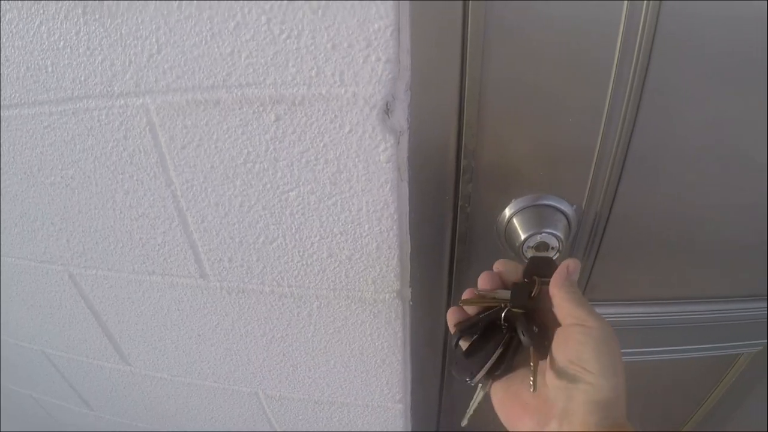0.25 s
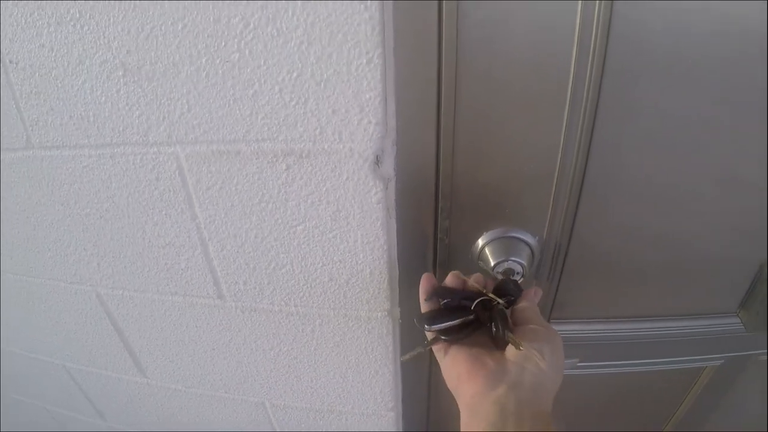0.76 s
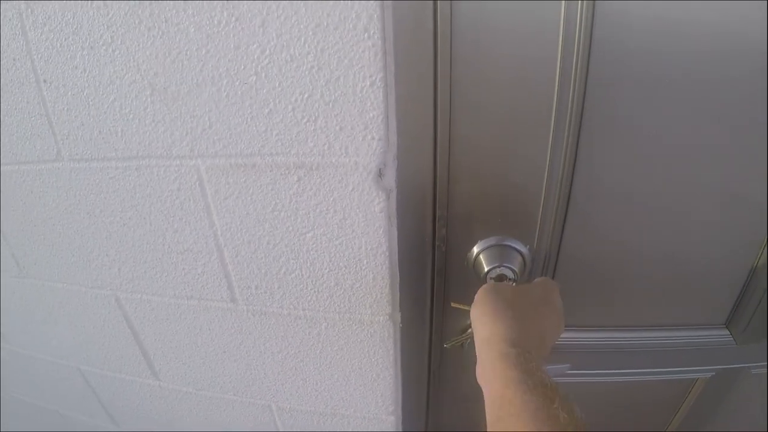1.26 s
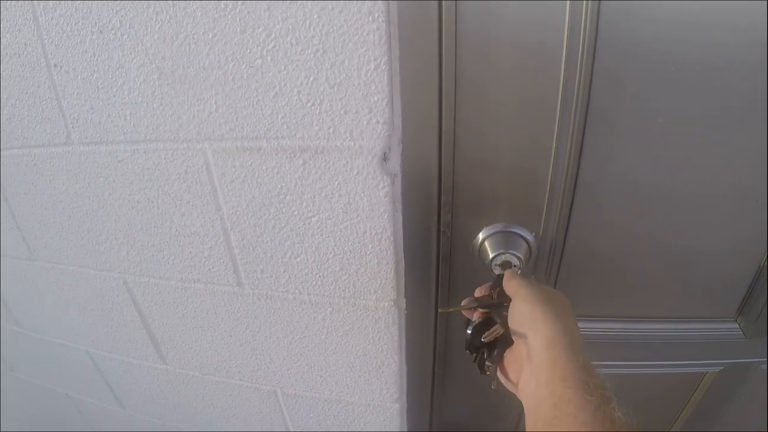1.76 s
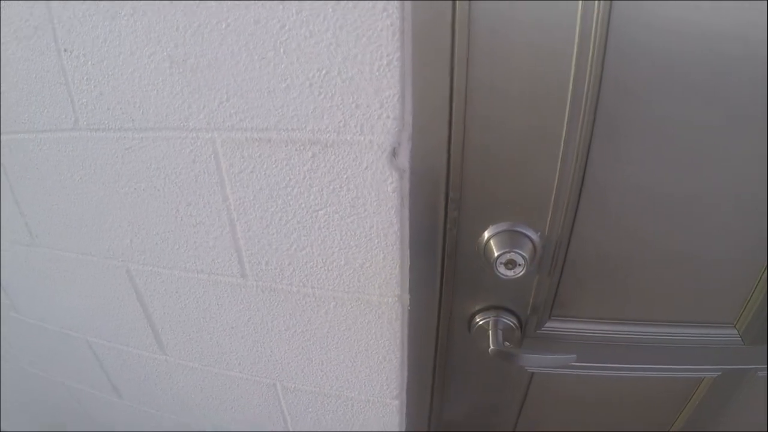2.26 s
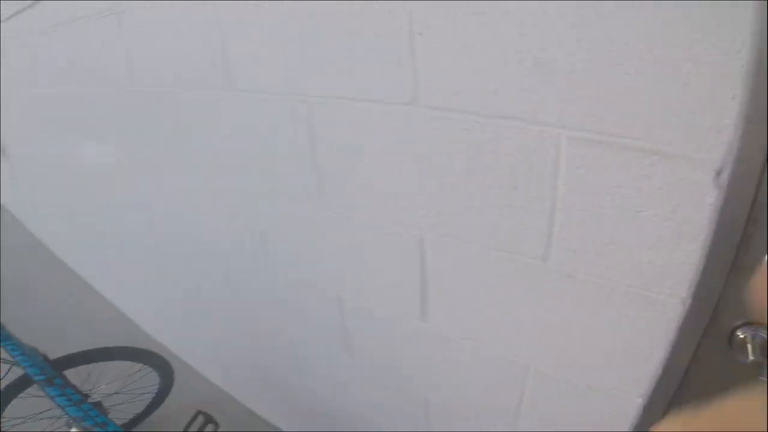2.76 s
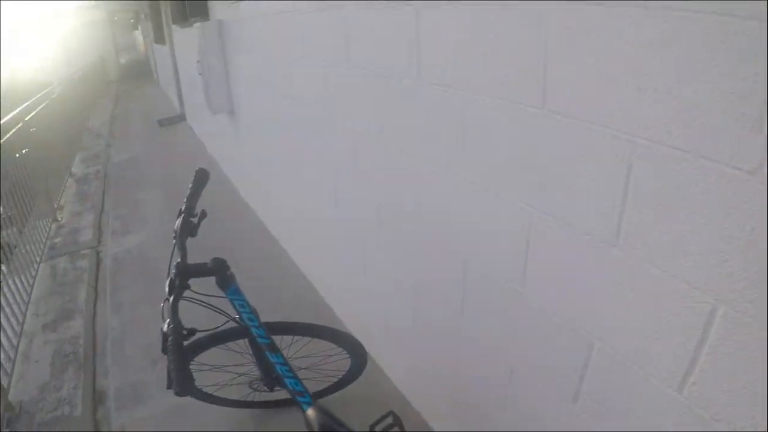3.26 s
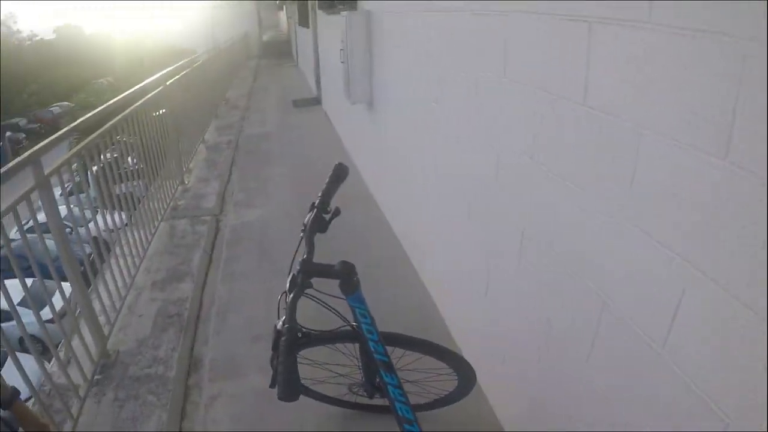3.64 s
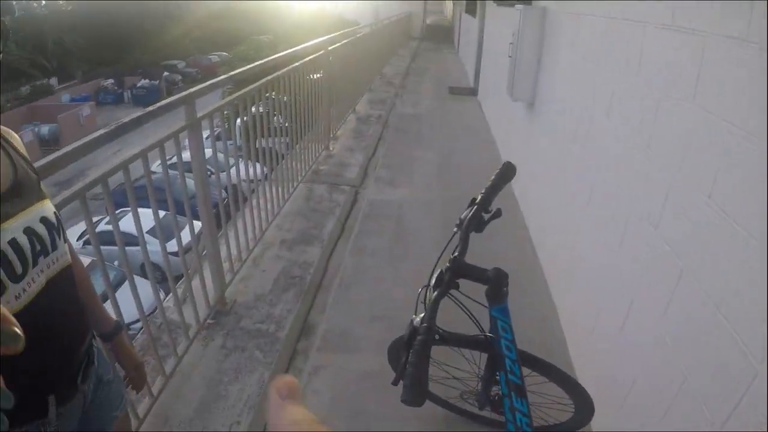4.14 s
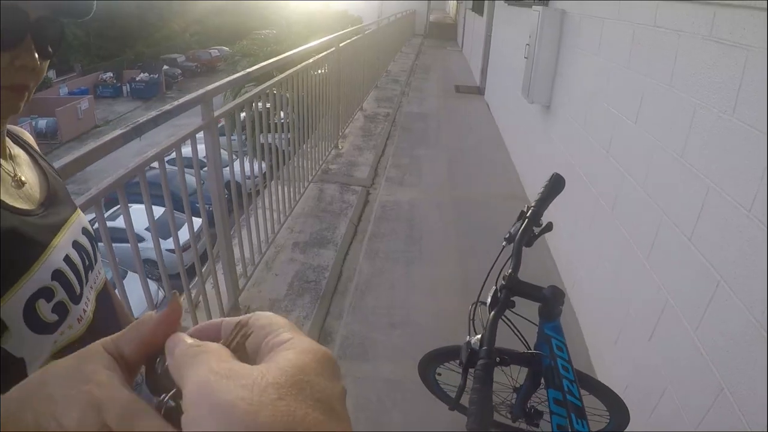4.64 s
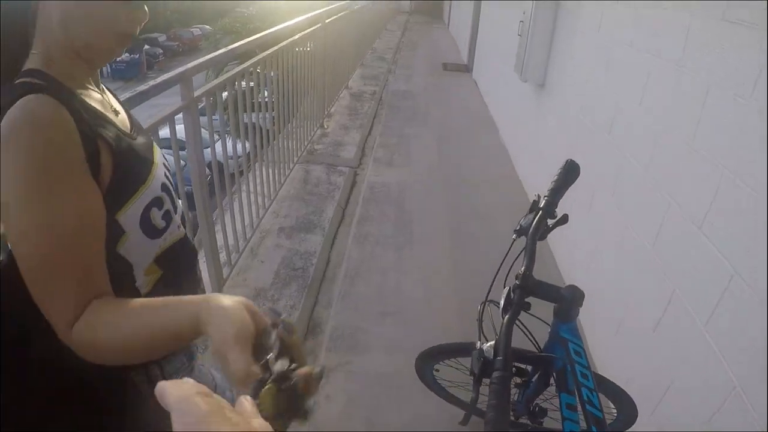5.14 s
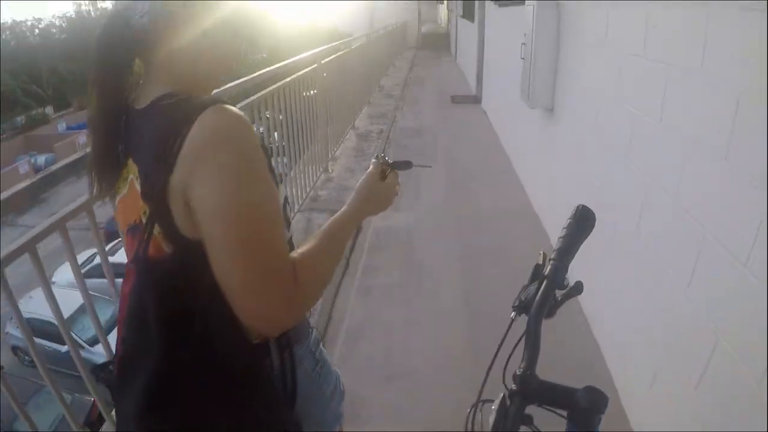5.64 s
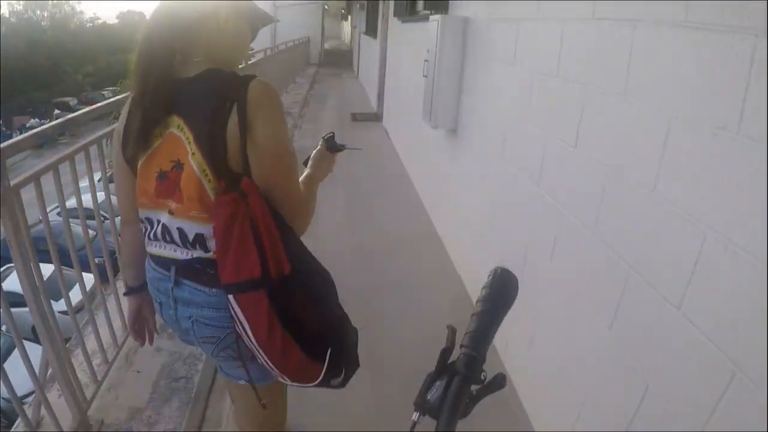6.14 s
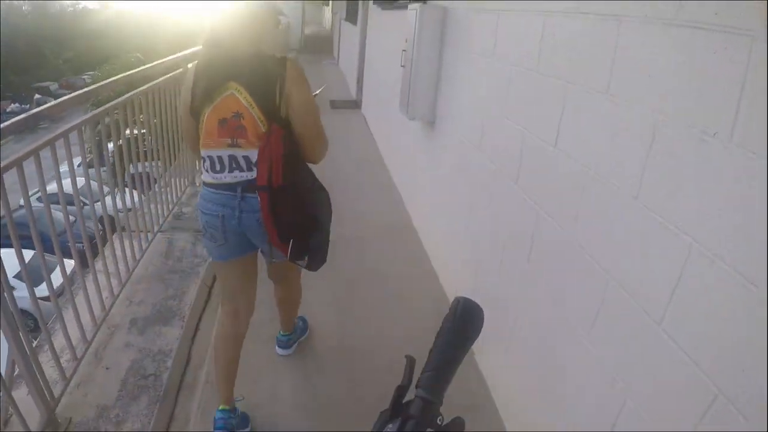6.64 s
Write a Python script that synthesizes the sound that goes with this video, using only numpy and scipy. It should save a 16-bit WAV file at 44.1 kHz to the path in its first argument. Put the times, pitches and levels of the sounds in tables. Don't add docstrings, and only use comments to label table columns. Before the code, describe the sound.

Close metallic key clatter and lock clunks, heavy handling thumps with a rubbery squeak, then soft key jingles over wind rumble and faint traffic.

```python
import sys
import numpy as np
from scipy import signal
from scipy.fft import rfft, irfft, next_fast_len
from scipy.io import wavfile
from scipy.ndimage import uniform_filter1d, map_coordinates

SR = 44100
rng = np.random.default_rng(int(sys.argv[2]) if len(sys.argv) > 2 else 0)


def to_wav(s):
    ch = np.atleast_2d(s).T
    pcm = np.round(np.clip(ch, -1, 1) * 32767)
    wavfile.write(sys.argv[1], SR, pcm.astype(np.int16))


def makeup_ratio(level_db):
    decades = np.asarray(level_db, float) / 20
    return 10 ** decades


N = 304290

# t/s, peak/dB, f/Hz, t60/s
THUMPS = [(0.237, -17.5, 42, 0.084), (3.124, -8.5, 35, .06), (3.163, -8.5, 14, 0.2),
          (3.222, -11, 40, 0.081), (0.63, -10, 58, 0.034), (0.956, -19, 45, 0.085), (1.316, -13, 48, 0.057),
          (1.338, -14, 43.6, 0.044), (2.089, -8, 29, 0.066), (2.121, -9, 30, 0.075), (2.526, 3, 32, 0.025),
          (2.543, -8, 104, 0.021), (2.932, -1, 44, 0.069), (2.955, -13, 42, .06), (3.053, -5.5, 38, 0.087),
          (3.3, -8.5, 32, 0.21), (3.385, -5, 31, 0.05), (3.419, -5, 78, 0.036), (3.622, -11.5, 33, 0.16),
          (3.669, 4.5, 32.5, 0.018), (5.6795, -12, 200, 0.023), (5.6901, -4.5, 184, 0.02),
          (5.7092, -17, 144, 0.038), (5.779, -11, 195, 0.065), (5.799, -12, 81, 0.14),
          (5.841, -11, 32, 0.09), (5.898, -8.5, 133, 0.079), (5.916, -7, 60, 0.041),
          (6.043, -14.5, 29, 0.15)]
# f/Hz, level/dB
CRACK = [(1180, -18), (2910, -10), (3740, -5), (4690, -14.5), (5750, -3.5), (7500, -4.5), (14200, -36.5),
         (16000, -59.5)]
JINGLE = [(2500, -23.5), (4050, 1.5), (4600, -7), (7100, -3), (8400, -3.5), (10000, -14), (14700, -30.5),
          (16500, -51.5)]
CUPPED = [(1200, -10), (2150, 10), (3000, -7), (4100, 5), (5600, -19), (8000, -10), (10500, -26),
          (15000, -43)]
# f/Hz, level/dB
SCRAPE = [(600, -120), (1100, -6), (1850, -4.5), (2400, -9), (3200, -9), (5500, -21.5), (8000, -120)]
BRIGHT = [(3000, -120), (4500, -8.5), (7000, 0.5), (10000, -11.5), (12500, -25), (15000, -34.5),
          (17000, -120)]
HOLLOW = [(80, -120), (160, 9), (400, -3), (650, -7), (1200, -18), (1800, -120)]


def unit(x):
    return x / np.sqrt(np.mean(x ** 2) + 1e-20)


def along(points, hz, column=1):
    rows = np.transpose(points)
    return np.interp(np.log(hz + 1), np.log(rows[0] + 1), rows[column])


def curves(rows):
    s, *cols = np.transpose(rows)
    return [np.interp(np.arange(N) / SR, s, c) for c in cols]


def wobble(rate_hz):
    knots = rng.standard_normal(int(N * rate_hz / SR) + 4)
    return map_coordinates(knots, [np.arange(N) * rate_hz / SR])


def filtered(x, response):
    m = next_fast_len(N + SR // 2)
    return irfft(rfft(x, m) * response(np.fft.rfftfreq(m, 1 / SR)), m)[..., :N]


def noise(spectrum):
    return unit(filtered(rng.standard_normal((2, N)), lambda hz: makeup_ratio(along(spectrum, hz))))


def impulses(s, db):
    return np.bincount(np.round(s * SR).astype(int), makeup_ratio(db), N)


def stroke(s, length_s):
    t = np.arange(N) / SR
    return np.clip(np.minimum((t - s) / 0.015, (s + length_s - t) / 0.018), 0, 1)


def strokes(rows):
    return sum(makeup_ratio(db) * stroke(s, length_s) for s, length_s, db in rows)


def decay(rows, t60s, rise_s):
    env, t = np.zeros(N + SR), np.arange(SR // 5) / SR
    for (s, db), t60 in zip(rows, t60s):
        fall = makeup_ratio(db - 60 * t / max(t60, .002))
        env[round(s * SR):][:len(t)] += fall * (1 - np.exp(-t / rise_s))
    return env[:N]


def swings(rows):
    out, t = np.zeros(N + SR), np.arange(SR // 4) / SR
    for s, db, hz, t60 in rows:
        fall = makeup_ratio(db + 9.0 - 60 * t / max(t60, .005))
        rise = 1 - np.exp(-t * hz / 0.035)
        out[round(s * SR):][:len(t)] += fall * np.sin(2 * np.pi * hz * t) * rise
    return out[:N]


def air():
    # t/s, level/dB
    stir = [(0.0, 3), (0.67, -0.5), (1.15, 4.5), (1.42, -0.5), (2.11, 2), (2.77, -0.5), (2.94, 2.5),
            (3.28, 12), (3.45, 4), (3.62, -6), (3.88, 0.5), (4.05, 0.5), (5.6, -0.5), (5.82, 5.5),
            (5.98, -1), (6.32, 3.5), (6.9, 4.5)]
    # t/s, level/dB
    wind = [(0, -19.5), (.15, -26.5), (.8, -24), (1.9, -22), (2.2, -18), (2.35, -19), (2.6, -24.5),
            (2.85, -30), (3.0, -23), (3.5, -16), (3.8, -33), (4.05, -25.5), (4.4, -25), (5.0, -32),
            (5.55, -31), (6.3, -28.5), (6.9, -22)]
    # t/s, hold/s, gain/dB
    ducks = [
        (2.53, 0.057, -16),
        (3.57, 0.063, -5),
        (3.661, 0.237, -7),
        (5.917, 0.12, -9.5),
    ]
    # f/Hz, level/dB
    rumble_spectrum = [(8, -16.5), (18, 5.5), (45, -2), (80, -12), (130, -29), (300, -120)]
    flutter_spectrum = [(50, -120), (85, -3), (140, 1.5), (250, -10.5), (450, -19.5), (900, -120)]
    murmur_spectrum = [(88, 2), (183, -4.5), (648, -13), (866, -12.5), (1650, -17), (2240, -22.5),
                       (3500, -43.5), (7700, -120)]
    hiss_spectrum = [(1470, -18), (2500, 3), (3830, 3), (5070, -1.5), (9810, -4), (13400, -17.5),
                     (15000, -20), (16000, -48.5)]

    stir_db, = curves(stir)
    duck_db = sum(db * stroke(s, hold_s) for s, hold_s, db in ducks)
    s, db, _, t60 = np.transpose(THUMPS)
    shake = decay(zip(s, db - 9.5), 3.6 * t60, rise_s=.012)
    deep = makeup_ratio(curves(wind)[0]) + shake
    rumble = deep * makeup_ratio(0.5 * duck_db) * unit(makeup_ratio(3.0 * wobble(12)) * noise(rumble_spectrum))
    flutter = unit(makeup_ratio(4.2 * wobble(16)) * noise(flutter_spectrum))
    flutter *= makeup_ratio(-40.5 + 1.5 * stir_db + duck_db)
    murmur = makeup_ratio(-40 + stir_db + duck_db + 1.3 * wobble(32)) * noise(murmur_spectrum)
    grit = makeup_ratio(1.1 * wobble(40) + 1.5 * wobble(300))
    hiss = makeup_ratio(-54 + 0.75 * stir_db + duck_db) * unit(grit * noise(hiss_spectrum))
    return rumble + flutter + murmur + hiss


def shimmer(shifts, spectrum, tick_db):
    ticks_per_s, tick_s = 120, 0.0015
    sizes = (rng.random(N) < ticks_per_s / SR) * makeup_ratio(3.3 * rng.standard_normal(N))
    ticks = unit(signal.lfilter([1], [1, -np.exp(-1 / (tick_s * SR))], sizes))
    grain = makeup_ratio(2.9 * wobble(70) + 1.7 * wobble(350))
    return strokes(shifts) * unit((grain + makeup_ratio(tick_db) * ticks) * noise(spectrum))


def bunch_shifts():
    # start/s, length/s, level/dB
    shifts = [
        (0, 0.072, -40),
        (.26, 0.087, -42),
        (1.0, 0.038, -49),
        (1.11, 0.11, -45),
        (1.26, 0.17, -42.5),
        (1.43, 0.2, -43),
        (1.84, 0.165, -43),
        (2.135, 0.088, -35),
        (2.63, 0.051, -42.5),
    ]
    # start/s, length/s, level/dB
    handed = [
        (4.37, .087, -54),
        (5.2, 0.064, -37),
        (5.27, .13, -38.5),
        (5.39, 0.054, -46.5),
        (6.112, 0.098, -45),
        (6.24, .12, -53.5),
    ]
    # start/s, length/s, level/dB
    rattle = [
        (3.87, 0.12, -44),
    ]
    out = shimmer(shifts, CRACK, tick_db=-13.5) + shimmer(handed, JINGLE, tick_db=-12)
    return out + shimmer(rattle, CUPPED, tick_db=8)


def keys(contacts, spectrum, t60, knock_db):
    # f/Hz, level/dB
    modes_table = [(3650, -16.5), (4020, -22), (5350, -27), (5890, -6.5), (6200, -3), (7080, -6),
                   (8400, -27.5), (9400, -7), (10300, -15.5), (12100, -27)]
    hz, level = np.transpose(modes_table)
    s, db, loudest_hz = np.transpose(contacts)
    luck = rng.standard_normal((len(s), 2, len(hz)))
    rattle = rng.random((len(s), 2, 9))
    ring, t = np.zeros(N + SR), np.arange(SR // 10) / SR
    rise = 1 - np.exp(-t / 0.000085)
    for k in range(len(s)):
        tones = np.append(hz * (1 + 0.011 * luck[k, 0]), loudest_hz[k])[:, None]
        sizes_db = np.append(level + 3.9 * luck[k, 1] - 15.0, -7)[:, None]
        modes = (makeup_ratio(sizes_db - 105 * t / t60) * np.sin(2 * np.pi * tones * t) * rise).sum(0)
        delays_s = np.append(0, 0.77 * t60 * rattle[k, 0])
        blows = makeup_ratio(-45 * delays_s / t60 - 4.5 * np.append(0, rattle[k, 1] + 0.36))
        hit = signal.fftconvolve(np.bincount((delays_s * SR).astype(int), blows), modes)
        ring[round(s[k] * SR):][:len(hit)] += makeup_ratio(db[k] + 0.084 * (db[k] + 23.0)) * hit

    lead_in = decay(zip((N - 1) / SR - s, db - 27.0), 0 * s + 0.024, rise_s=0.00024)[::-1]
    slide = lead_in + decay(zip(s, db - 17.5), 0 * s + 1.88 * t60, rise_s=0.0016)
    strike = decay(zip(s, db + 0.5), 0 * s + 0.0055, rise_s=0.00051)
    body = clunks(s, db + knock_db)
    snap = filtered(impulses(s, db + 4.5), lambda f: makeup_ratio(along(spectrum, f)))
    grit = wobble(500)
    tonal = (makeup_ratio(3.2 * grit - 0.5) * ring[:N] + snap) * [[1], [.3]]
    return tonal + (strike + makeup_ratio(4.17 * grit) * slide) * noise(spectrum) + body


def lock_contacts():
    # t/s, peak/dB, loudest key f/Hz
    going_in = [(0.0034, -22, 6700), (0.029, -16, 7150), (0.0452, -13.5, 6900), (0.0625, -6, 7330),
                (0.1575, -22, 3960), (0.167, -15, 7260), (0.268, -11, 7160), (0.288, -30, 6250),
                (0.3084, -18, 6060), (0.3301, -20, 7100), (0.389, -19.5, 6180), (0.483, -32.5, 6800),
                (0.5543, -28.5, 6160), (0.668, -30.5, 6100)]
    turning = [(0.945, -19, 6800), (0.9851, -9.5, 6340), (1.0123, -8, 7170), (1.0376, -15.5, 3600),
               (1.1174, -19, 5850), (1.149, -18.5, 5840), (1.1902, -8.5, 6500), (1.2452, -4.5, 5600),
               (1.257, -6.5, 7300), (1.2732, -2, 6900), (1.409, -24.5, 6950), (1.449, -21, 6000),
               (1.4684, -16.5, 5500), (1.4943, -13, 5750), (1.552, -21, 5800), (1.5783, -19, 6240),
               (1.661, -28.5, 6300)]
    coming_out = [(1.6991, -14, 6320), (1.7754, -21, 6000), (1.8003, -26, 6000), (1.8493, -24.5, 6000),
                  (1.8587, -14.5, 6200), (1.8976, -16, 5900), (1.9192, -20, 3640), (1.929, -14.5, 5700),
                  (1.964, -16.5, 5830), (1.9766, -12, 5980), (2.017, -29.5, 5900), (2.097, -22.5, 3870),
                  (2.105, -18.5, 4200), (2.1471, -12.5, 6930), (2.165, -13.5, 6230), (2.174, -17.5, 6430),
                  (2.201, -21, 7200), (2.303, -18.5, 7050), (2.352, -25.5, 6100), (2.3936, -18, 6800),
                  (2.632, -20, 6070)]
    grazes = [(.0114, -24.5, 6600), (.0207, -25, 7100), (.244, -30.5, 3650), (.2568, -24, 7300),
              (.2764, -23, 7340), (.3964, -24.5, 7000), (.49, -31, 6100), (.5117, -38, 6100),
              (.611, -34, 6200), (.7174, -32.5, 7070), (.9362, -27, 7600), (.9514, -39, 7420),
              (.9779, -35.5, 8000), (1.0055, -30, 8500), (1.9047, -23, 6470), (1.944, -16, 6040),
              (2.0507, -31, 6000), (2.14, -21.5, 5900), (2.1573, -16.5, 8500), (2.2966, -24.5, 4000)]
    out = keys(grazes, CRACK, t60=0.021, knock_db=-13)
    out += keys(going_in + coming_out, CRACK, t60=.025, knock_db=-18.0)
    return out + keys(turning, CRACK, t60=.021, knock_db=-16.0)


def rings():
    # t/s, peak/dB, f/Hz, t60/s
    free = [(.029, -27, 13500, .015), (.029, -27.5, 9500, 0.019), (.0452, -24.5, 9700, 0.021),
            (.058, -26, 12050, 0.019), (.0625, -18.5, 7250, 0.036), (.167, -23.5, 7150, 0.028),
            (.395, -36, 7150, 0.05), (.33, -37.5, 7150, 0.042), (.268, -19, 4850, 0.015),
            (.985, -20, 3800, 0.017), (.985, -27, 2300, 0.017), (1.012, -16, 5670, 0.033),
            (1.866, -19.5, 5930, 0.034), (2.157, -24.5, 10200, 0.05), (1.939, -25, 5900, 0.044),
            (1.977, -19.5, 5950, 0.033), (2.105, -29.5, 4020, 0.037), (2.15, -28, 2430, 0.053),
            (2.15, -23.5, 7100, .06), (2.303, -22.5, 7080, 0.034), (2.165, -13, 5930, 0.073),
            (2.2, -29, 7200, 0.072), (2.298, -32, 4050, 0.047), (4.401, -28, 5780, 0.031),
            (5.206, -48, 12100, 0.054), (5.229, -21, 8350, 0.12), (5.228, -18, 7800, 0.047),
            (5.232, -22, 9100, .05), (5.232, -34, 4050, 0.073), (5.289, -28, 7100, .05),
            (5.289, -26.5, 4020, 0.045), (5.314, -29, 7100, 0.087), (5.318, -41.5, 12300, .08),
            (5.366, -26.5, 8450, 0.068), (5.372, -35, 11000, 0.044), (5.371, -23.5, 4010, 0.046),
            (6.044, -38, 6640, 0.05), (6.15, -45, 8420, .12), (6.15, -58, 12160, .15),
            (6.118, -42, 3850, 0.083), (6.14, -42, 5950, .1), (6.53, -44, 4270, .1),
            (6.58, -44, 3290, 0.084)]
    # t/s, peak/dB, f/Hz
    tip_ticks = [(4.5161, -37, 3740), (4.5615, -29.5, 7450), (4.6039, -40, 3920), (4.6628, -37, 6060),
                 (4.6997, -37, 5940), (4.7154, -41, 4800), (4.7521, -33, 4280), (4.8274, -40, 4880),
                 (4.8369, -31, 5000), (4.8514, -46, 5150), (4.8614, -28.5, 4950), (4.8914, -39, 6710),
                 (4.9164, -34, 5990)]
    tips = swings([(s, db - 9.5, hz, 0.0063) for s, db, hz in tip_ticks])
    return (makeup_ratio(-8.5 + 4.6 * wobble(350)) * swings(free) + tips) * [[1], [.3]]


def rubs():
    # start/s, length/s, scrape/dB, bright/dB, hollow/dB
    rub_table = [(0.052, 0.068, -39, -45, -29), (1.146, 0.029, -42, -60, -29.5),
                 (1.245, 0.058, -36, -40, -25.5), (1.61, 0.046, -36.5, -48, -41.5),
                 (2.504, 0.046, -34.5, -44.5, -26.5), (2.686, 0.094, -40.5, -53.5, -44.5),
                 (2.852, 0.059, -35.5, -57, -44), (2.934, 0.078, -42, -52, -33.5),
                 (3.042, 0.082, -27.5, -35, -27.5), (3.118, 0.092, -21.5, -27, -24),
                 (3.207, 0.067, -23.5, -40, -24), (3.24, 0.25, -43.5, -74, -31.5),
                 (3.434, 0.13, -36.5, -48, -33), (3.652, 0.024, -31.5, -39, -20.5),
                 (5.616, 0.082, -31.5, -36.5, -28), (5.7, 0.063, -37, -39, -28),
                 (5.759, 0.057, -32, -51, -19), (5.843, 0.085, -42.5, -61, -28.5),
                 (6.039, 0.039, -35, -47, -37), (6.449, 0.04, -41, -76, -32.5),
                 (6.548, 0.09, -46, -70, -37.5)]
    # start/s, length/s, level/dB
    swishes = [
        (3.05, 0.042, -48),
        (3.135, 0.043, -44),
        (5.624, 0.067, -40),
        (5.715, 0.034, -44),
        (6.557, .07, -59),
    ]
    # f/Hz, level/dB
    airy = [(5000, -120), (8000, 3), (12500, 0), (15000, -8), (15500, -120)]
    t = np.arange(N) / SR

    def swell(s, length_s):
        return np.clip(np.minimum((t - s) / 0.3, (s + length_s - t) / 0.37) / length_s, 0, 1)

    scrape, bright, hollow = sum(makeup_ratio(np.array(dbs))[:, None] * swell(s, length_s)
                                 for s, length_s, *dbs in rub_table)
    slips = makeup_ratio(1.9 * wobble(83) + 1.96 * wobble(400))
    out = slips * (scrape * noise(SCRAPE) + bright * noise(BRIGHT))
    out += makeup_ratio(3.5 * wobble(70)) * hollow * noise(HOLLOW)
    return out + strokes(swishes) * noise(airy)


def clunks(s, db):
    # f/Hz, level/dB
    lock = [(500, -120), (800, -10), (975, 3.5), (1250, -7), (2100, -2.5), (3000, -15), (4500, -120)]
    return decay(zip(s, db - 6.0), 0 * s + 0.048, rise_s=0.0012) * noise(lock)


def thumps():
    # t/s, peak/dB, f/Hz, t60/s
    cavity = [
        (0.4237, -18.5, 2090, 0.016),
        (1.255, -22, 151.5, 0.11),
        (3.403, -14, 2700, 0.0081),
        (5.788, -16.5, 2280, 0.0091),
        (5.9, -20, 2120, 0.015),
        (5.914, -12.5, 626, 0.039),
    ]
    return swings(THUMPS + cavity) * [[1], [.2]]


def knocks():
    # t/s, peak/dB, bright/dB, hollow/dB (both re peak)
    taps = [(0.4236, -6.5, -17, -6), (2.5403, -10.5, -7, 3.5), (3.056, -3.5, -10, -0.5),
            (3.2815, -31.5, 17, 11), (3.338, -26, 17.5, 2), (3.356, -17, 5.5, 4), (3.4024, -4, -7.5, -3.5),
            (3.417, -5.5, -33, 0.5), (3.435, -13.5, -12, -11), (3.6654, -5, -12.5, -32),
            (5.7883, -6.5, -20, -7), (5.8627, -5, -14, -25), (5.899, -5.5, -18, 10), (5.9244, -9, -12.5, 4)]
    s, db, bright_db, hollow_db = np.transpose(taps)
    ranges = [(db, 14, .012, SCRAPE),
              (db + bright_db, 9, .012, BRIGHT),
              (db + hollow_db, 22, .025, HOLLOW)]
    out = np.zeros((2, N))
    for level_db, spike_db, t60, spectrum in ranges:
        spikes = impulses(s + 0.00064, level_db + spike_db)
        out += filtered(spikes, lambda f: makeup_ratio(along(spectrum, f))) * [[1], [.7]]
        out += decay(zip(s, level_db - 7.0), 0 * s + t60, rise_s=0.00032) * noise(spectrum)
    return out


def squeaks():
    # start/s, length/s, level/dB
    drags = [
        (3.444, 0.12, -16.5),
        (3.09, 0.136, -29),
        (3.21, 0.067, -20.5),
        (3.27, .1, -35),
        (1.145, 0.043, -27),
    ]
    # f/Hz, level/dB
    pocket = [(400, -7), (620, -3), (760, -13), (1100, -22.5), (1500, -36), (3000, -43), (3700, -33),
              (4400, -120)]
    s, length_s, db = drags[0]
    whine_hz = 619 * (1 + 0.167 * wobble(150))
    whine = makeup_ratio(db - 0.4) * stroke(s, length_s) * np.sin(2 * np.pi * np.cumsum(whine_hz) / SR)
    return (strokes(drags) * noise(pocket) + whine) * makeup_ratio(1.7 * wobble(90)) * [[1], [.25]]


def judder():
    start_s, slips_per_s, strongest = 3.0878, 93.5, 5
    peak_db, swell_db_per_slip, swing_hz, t60 = -4, 1, 343, 0.0092
    k, t = np.arange(11), np.arange(SR // 20) / SR
    swing = -makeup_ratio(-60 * t / t60) * np.sin(2 * np.pi * swing_hz * t)
    slips = impulses(start_s + k / slips_per_s, peak_db - swell_db_per_slip * np.abs(k - strongest))
    return signal.fftconvolve(slips, swing)[:N] * [[1], [.5]]


def palm_contacts():
    # t/s, peak/dB, loudest key f/Hz
    palm = [(3.8843, -30, 4620), (3.892, -39, 3520), (3.9, -31, 2180), (3.907, -36, 2230),
            (3.9244, -29, 4070), (3.931, -26, 2220), (3.9474, -38, 3900), (3.9572, -34, 2140),
            (3.97, -40, 2140), (3.992, -39, 4230), (4.0048, -34, 4100), (4.0154, -29, 4100),
            (4.0233, -37, 3860), (4.043, -25.5, 2270)]
    return keys(palm, CUPPED, t60=0.032, knock_db=-25)


def loose_contacts():
    # t/s, peak/dB, loudest key f/Hz
    passed = [(3.8722, -27.5, 3600), (4.0478, -31, 7060), (4.246, -29, 5580), (4.392, -23, 6270),
              (4.455, -27.5, 9380), (4.6287, -32.5, 4600), (4.7286, -33, 4900), (4.804, -31, 3850),
              (4.8787, -33, 5300), (5.1343, -28.5, 6570), (5.2123, -19, 8950), (5.2265, -13, 8500),
              (5.2325, -21, 8400), (5.2894, -15.5, 6000), (5.3154, -21, 6980), (5.3572, -29, 6700),
              (5.3689, -21.5, 8500), (6.0435, -19, 4070), (6.118, -33.5, 3600), (6.1494, -30, 6100),
              (6.179, -33, 8400),
              (4.1234, -36, 5550), (4.176, -41.5, 3530), (4.197, -37.5, 8100), (4.337, -35, 2870),
                (4.376, -34, 6000), (4.4004, -34, 5830), (4.4194, -30.5, 9300), (4.4954, -35, 5960),
                (5.1103, -36, 8400), (5.1247, -36, 8450), (5.201, -29, 9600), (5.2396, -21.5, 9000),
                (5.2514, -34, 8460), (5.2815, -24.5, 4050), (5.3405, -30, 5900), (5.392, -34, 7540),
                (6.2477, -33, 4140), (6.405, -37, 4040)]
    return keys(passed, JINGLE, t60=0.045, knock_db=-16.5)


def walkway(pair, t60, wet_db):
    t = np.arange(SR // 3) / SR
    tail = uniform_filter1d(rng.standard_normal((2, len(t))), size=3) * makeup_ratio(-60 * t / t60)
    tail /= np.linalg.norm(tail[0])
    return pair + makeup_ratio(wet_db) * signal.fftconvolve(pair[:1], tail, axes=1)[:, :N]


def bunch():
    # t/s, level/dB
    dull = [(0.063, -15), (0.911, -27.5), (0.9844, -24), (1.013, -14), (1.1174, -16), (1.147, -14.5),
            (1.192, -16), (1.256, -7), (1.9324, -20), (2.351, -31.5), (3.931, -32), (6.676, -24.5)]
    out = lock_contacts() + loose_contacts() + palm_contacts() + rings()
    out = walkway(out + clunks(*np.transpose(dull)), t60=0.15, wet_db=-11)
    return out + bunch_shifts()


def ports(pair, alike_db, apart_db, pattern):
    # f/Hz, level/dB
    apart = [(40, -18.5), (120, -10.5), (450, -0.5), (1000, 7), (2400, 1.5), (3700, -9.5), (5200, 1),
             (6500, 0), (15000, -1)]

    def follow(hz):
        return makeup_ratio(along(pattern, hz) + alike_db) * np.exp(1j * along(pattern, hz, column=2))

    side = filtered(pair[0], follow)
    side += filtered(pair[1], lambda hz: makeup_ratio(along(apart, hz) + apart_db))
    return np.array([pair[0] + side, pair[0] - side])


def width_db():
    # start/s, end/s
    folds = [
        (3.68, 5.68),
        (6.1, 7.5),
    ]
    fold_db_per_s, open_db_per_s, folded_db = 74, 61, -39
    t = np.arange(N) / SR
    total = 0
    for start, end in folds:
        ramp_db = np.maximum(fold_db_per_s * (start - t), open_db_per_s * (t - end) - 3.5)
        total = total + np.clip(ramp_db, folded_db, 0) * (t < end)
    return total


def scene():
    # f/Hz, level/dB, phase/rad
    airborne = [(59.7, -34.5, 0.5), (686, -1, -0.6), (950, 2.5, -1.3), (1700, -22, -3), (3600, -20, -2.2),
                (5300, -6.5, 0.7), (8500, -3.5, -1.2), (12160, -4.5, -1.5)]
    touch = [(45, -18, 1.5), (110, -10, 1.5), (350, -7, 0.63), (700, 6.5, -1.1), (1500, -6, -1.4),
             (6000, -11, -0.26)]
    heard = ports(air(), alike_db=-6.0, apart_db=-1.0, pattern=airborne)
    heard += ports(bunch(), alike_db=3.0, apart_db=-6.5, pattern=airborne)
    heard += ports(knocks() + squeaks() + judder(), alike_db=-41.0, apart_db=1.0, pattern=airborne)
    return heard + ports(rubs() + thumps(), alike_db=-3.5, apart_db=0.5, pattern=touch)


def band_limit(x):
    return signal.sosfilt(signal.butter(12, 16510, fs=SR, output="sos"), x)


def record(dry):
    mid, side = (dry[0] + dry[1]) / 2, (dry[0] - dry[1]) / 2
    top = filtered(side, lambda hz: hz > 11800)
    side = top + (side - top) * makeup_ratio(width_db())
    x = filtered(np.array([mid + side, mid - side]), lambda hz: 1j * hz / (14 + 1j * hz))
    x = x / (1 + np.abs(x / .99) ** 8) ** (1 / 8)
    x = filtered(x, lambda hz: hz < 16000)
    return band_limit(x)


dry = scene()
out = record(dry)
to_wav(out)
```